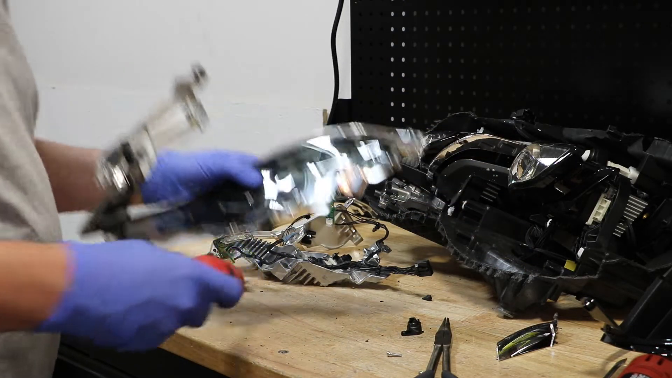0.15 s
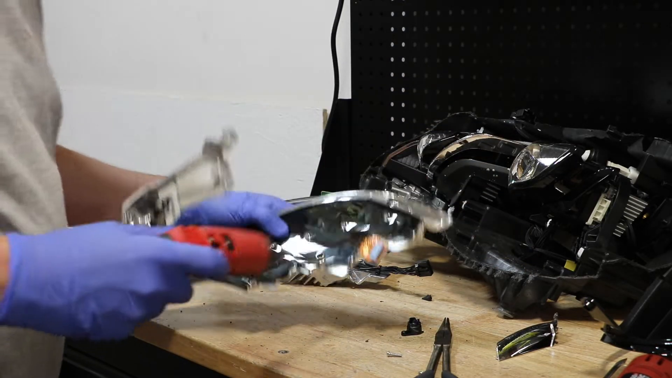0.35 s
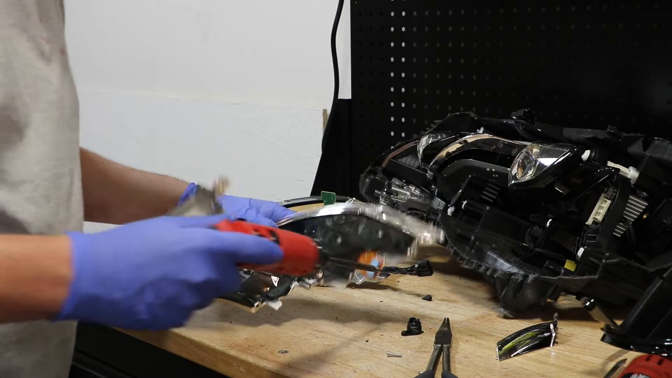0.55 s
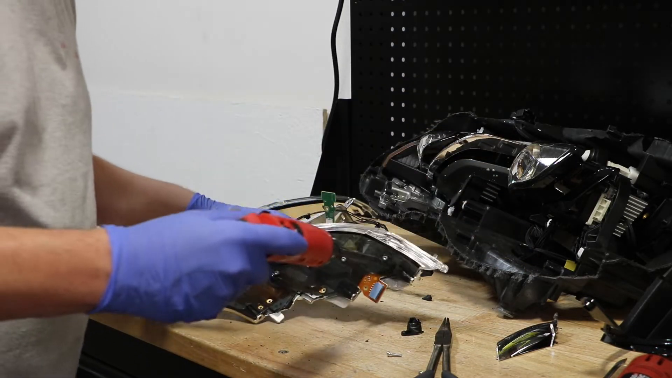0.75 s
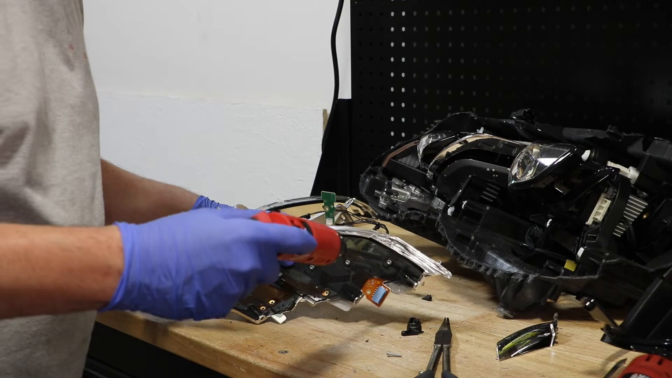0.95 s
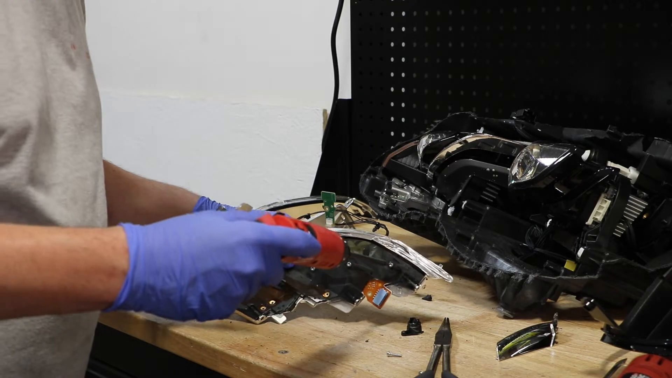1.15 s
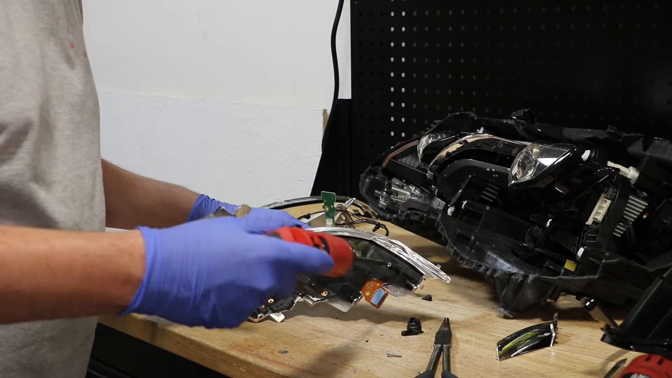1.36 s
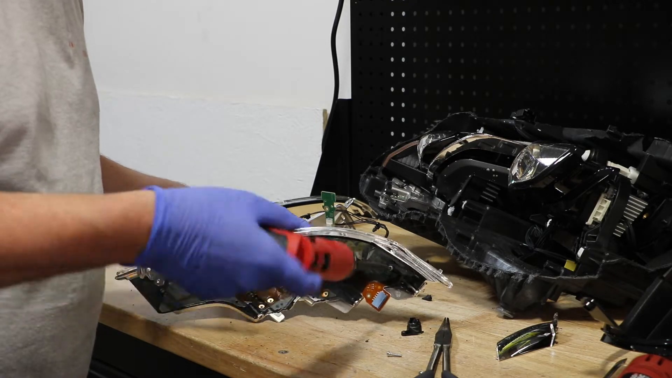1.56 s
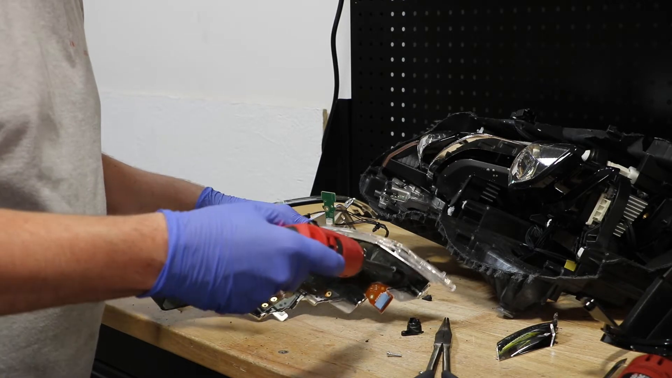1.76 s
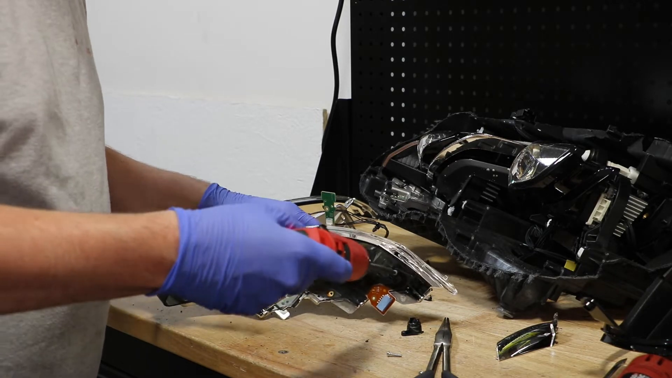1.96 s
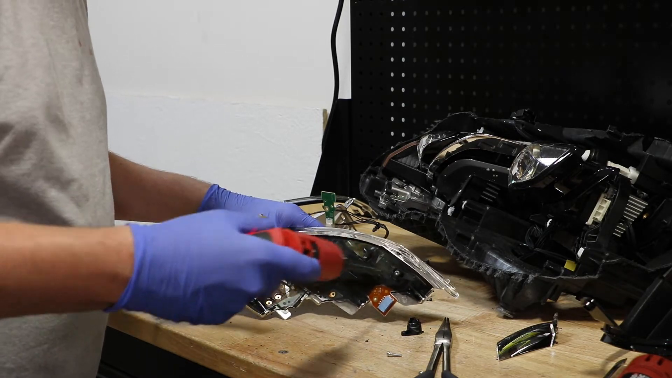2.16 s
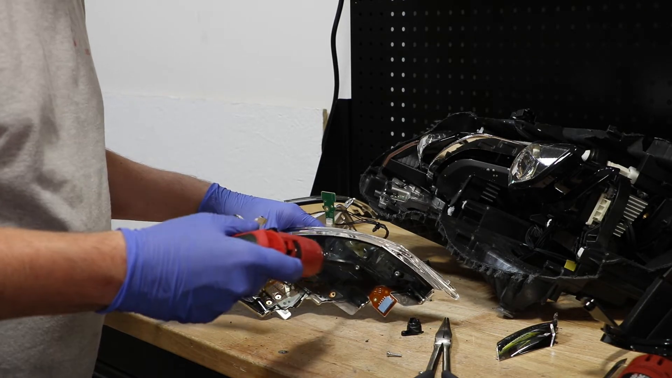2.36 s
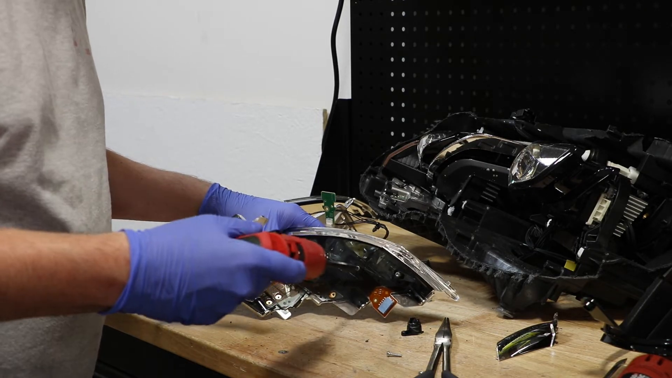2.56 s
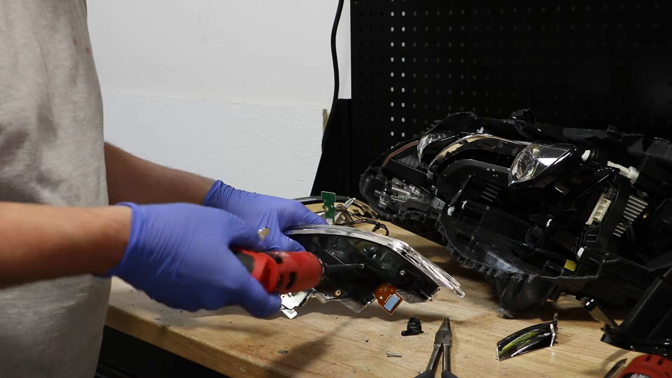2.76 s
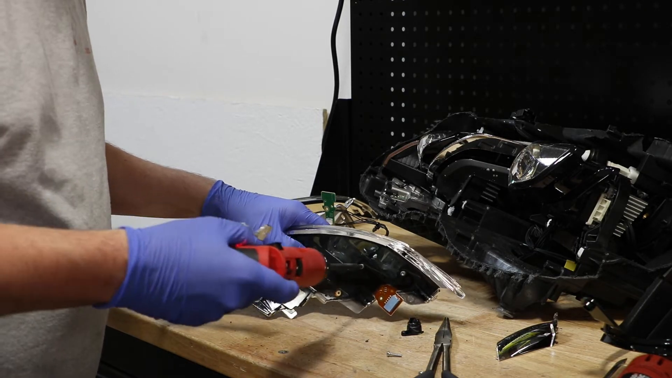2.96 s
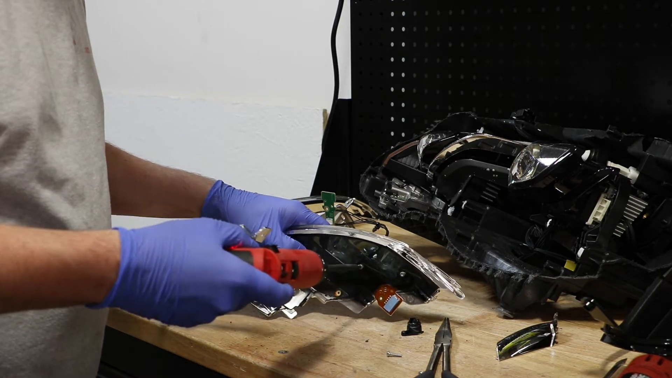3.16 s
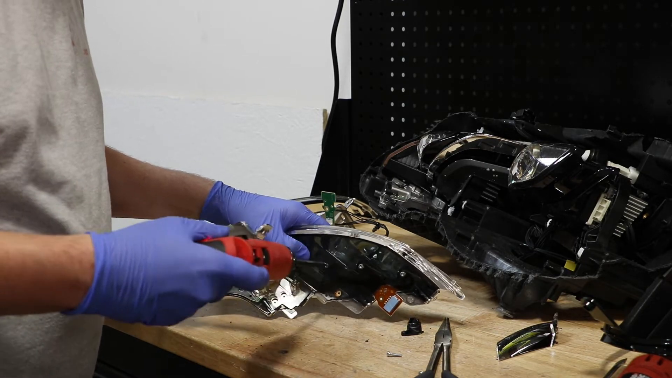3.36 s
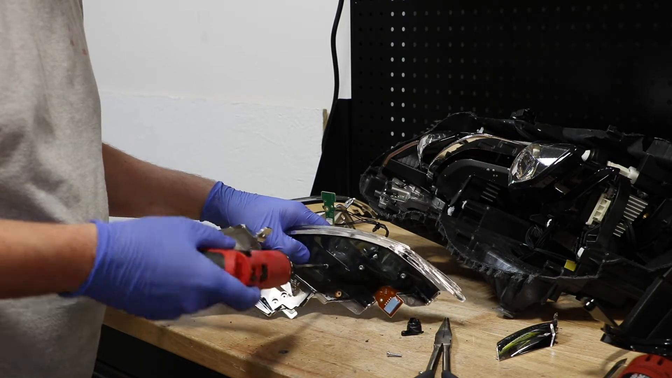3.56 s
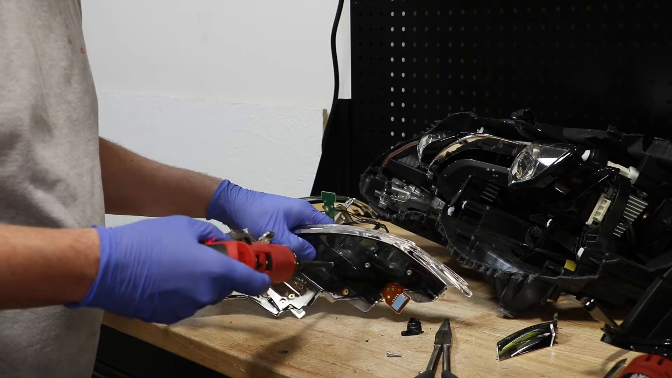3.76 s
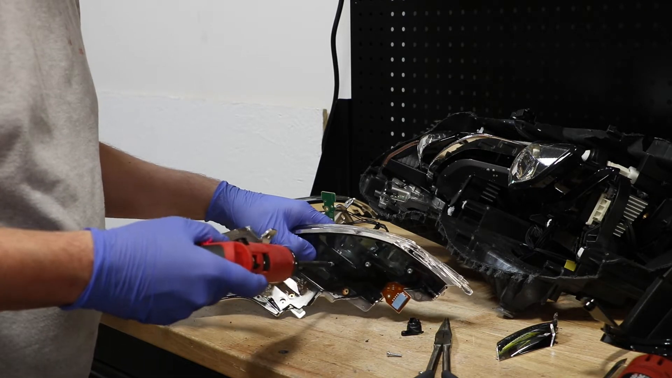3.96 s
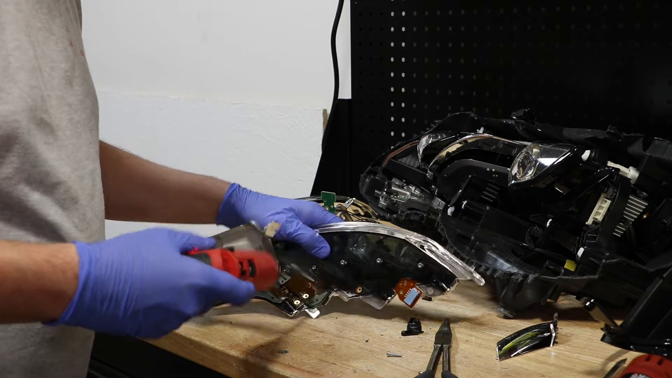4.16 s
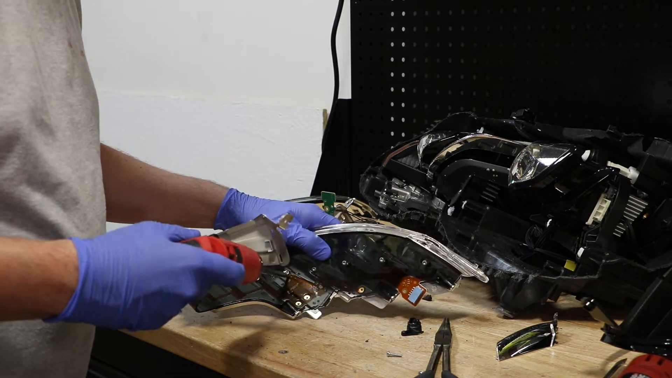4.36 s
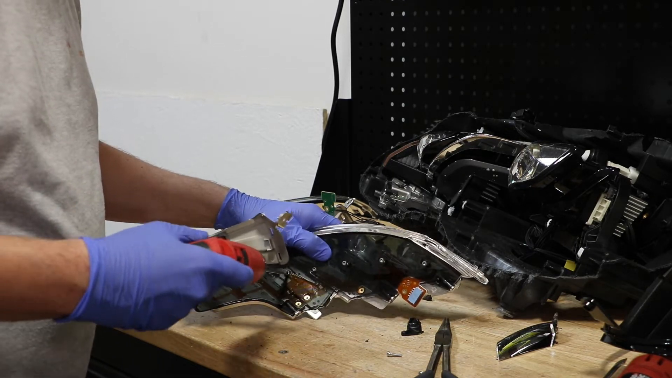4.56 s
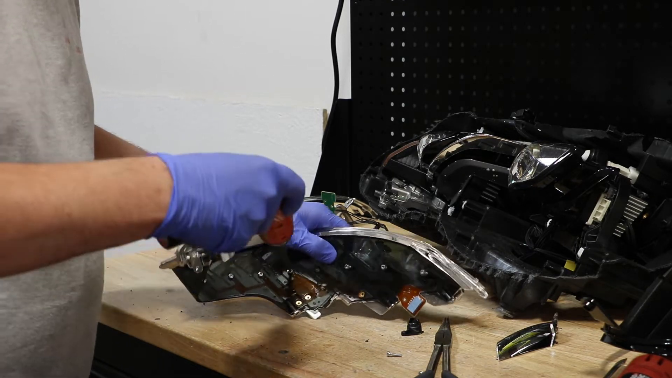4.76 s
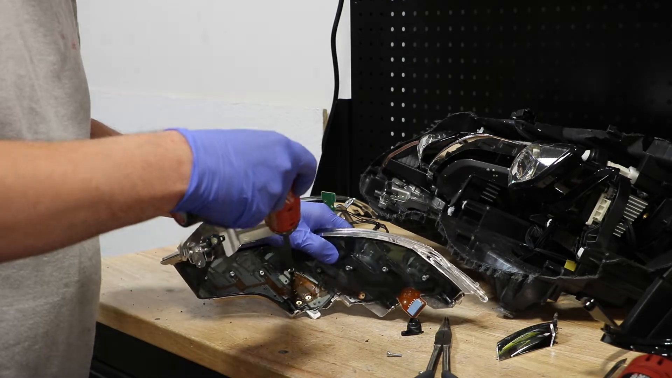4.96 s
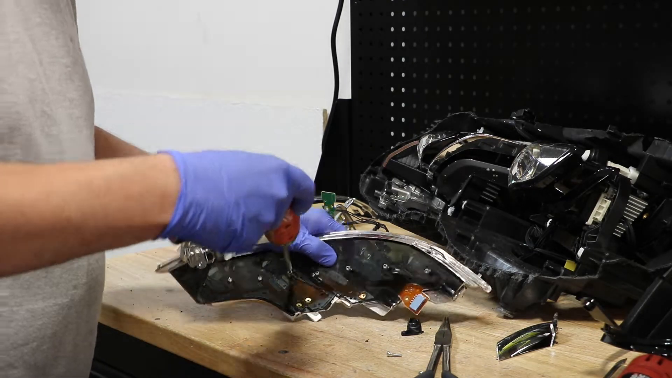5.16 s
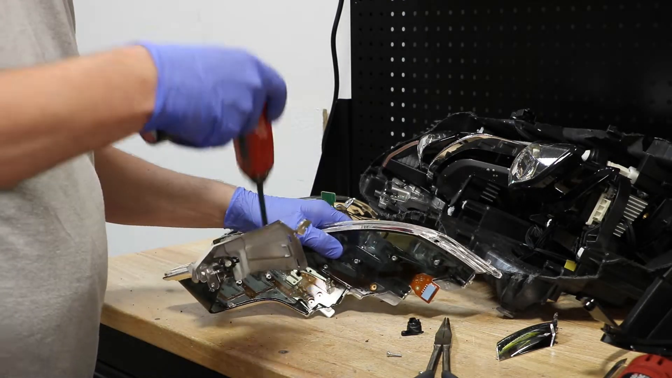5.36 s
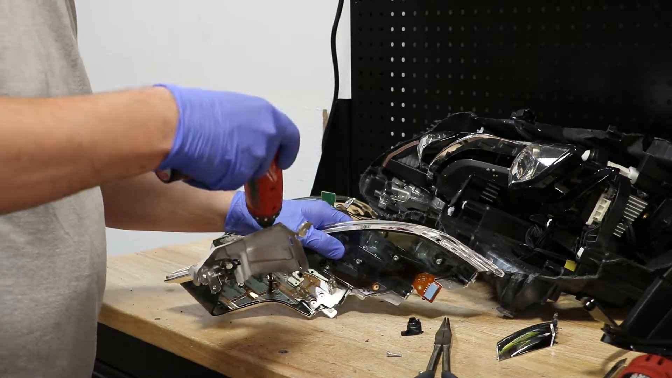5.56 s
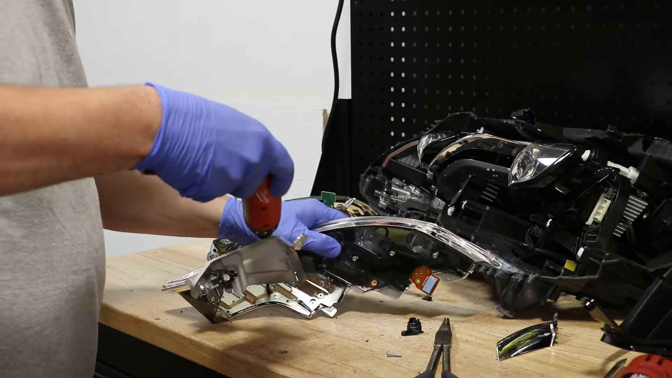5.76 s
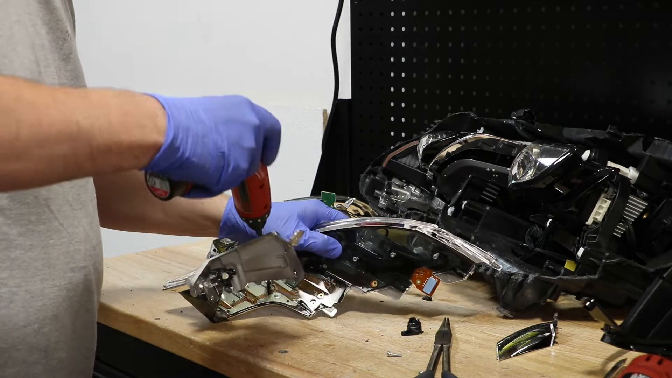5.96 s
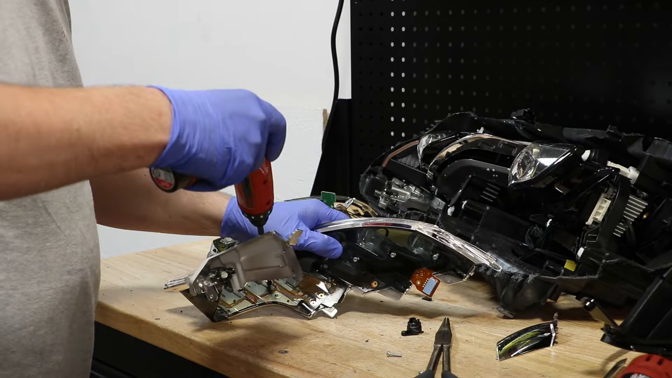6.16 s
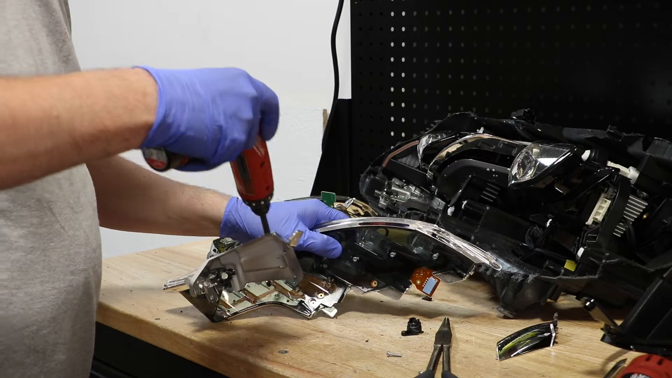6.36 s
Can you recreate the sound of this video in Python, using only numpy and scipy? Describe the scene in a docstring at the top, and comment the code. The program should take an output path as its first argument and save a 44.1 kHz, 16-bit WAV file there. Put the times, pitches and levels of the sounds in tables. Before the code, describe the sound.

Close-up bench work: a rigid plastic piece is set down with a clattering thud and a short slide. Then crisp ticks and slips of a metal bit lead into five short runs of a small cordless screwdriver, gritty gear whine climbing and dropping away. Later bursts add a rattling buzz from the plastic housing. A low room hum and a slight short reverberation lie behind it.

```python
"""A plastic part scrapes and knocks as it is set down on a wooden bench, in a faintly humming workshop.
Then a small cordless screwdriver backs screws out of it in five bursts; the bit ticks, slips and searches.
Knocks are gritty contacts ringing decaying modes; rubbing is patchy filtered noise. The motor is orders of
the shaft speed, gear noise, brush hiss and housing buzz. The microphone's limiter ducks after loud peaks."""
import sys
import numpy as np
from scipy import signal
from scipy.fft import rfft, irfft
from scipy.io import wavfile
from scipy.ndimage import uniform_filter1d, minimum_filter1d

SR = 44100
rng = np.random.default_rng(int(sys.argv[2]) if len(sys.argv) > 2 else 0)


def dump(signal):
    """Clip the signal to [-1, 1] and save it as 16-bit WAV at the path in sys.argv[1]."""
    limited = np.clip(np.atleast_2d(signal).T, -1, 1)
    pcm = np.round(limited * 32767).astype(np.int16)
    wavfile.write(sys.argv[1], SR, pcm)


N = 286650

# Workshop noise spectrum: (frequency [Hz], relative density [dB])
SHOP_SPECTRUM = [(120, -40.5), (200, 0), (454, -1.5), (506, -1), (609, -1), (663, -2), (888, -9.5),
                 (1100, -1), (1430, -34), (2420, -120)]
# Deep rumble spectrum: (frequency [Hz], relative density [dB])
RUMBLE_SPECTRUM = [(12, -36), (20, -2.5), (65, 6.5), (97, -6), (124, -6), (140, -18), (180, -43.5),
                   (310, -120)]
# Room over time: (time [s], noise level [dB], rumble level [dB])
ROOM_LEVELS = [(0.0, -39.5, -53), (0.12, -48, -62), (0.54, -66, -64), (0.74, -64, -70), (0.8, -48, -45.5),
               (1.0, -54, -62), (1.18, -65.5, -80), (1.9, -68, -81), (2.6, -66.5, -78), (3.1, -69, -86),
               (4.14, -60.5, -77), (5.27, -77, -80), (5.7, -53.5, -61), (6.1, -66.5, -76), (6.5, -65, -74)]
# Hum bands: (frequency [Hz], width [Hz], mean level [dB])
HUM_BANDS = [(119, 14, -72.5), (524, 3.8, -74.5), (631, 14, -69), (834, 17, -76.5)]
# Drone swells, added to its steady level: (time [s], level [dB])
DRONE_SWELLS = [(0.4, -68), (0.76, -67), (1.2, -69), (1.57, -65), (2.0, -55.5), (2.3, -64), (3.06, -70),
                (4.14, -73.5), (5.05, -60.5), (5.79, -64)]
DRONE_HZ, DRONE_DB, SWELL_S = 165.3, -71, .05

# Dull scrape spectrum: (frequency [Hz], relative density [dB])
SCRAPE_SPECTRUM = [(410, -41), (700, -33.5), (1220, -32), (1320, 0.5), (1440, 6.5), (2210, 9), (2620, -7),
                   (3000, -39), (3900, -60.5), (6600, -120)]
# Plastic creak spectrum: (frequency [Hz], relative density [dB])
CREAK_SPECTRUM = [(1470, -24.5), (2500, -5), (3450, 2.5), (3780, -4), (4130, -3.5), (4650, 0), (5650, -9),
                  (7500, -15.5), (8200, -26), (10700, -43), (18000, -120)]
# Thin fizz spectrum: (frequency [Hz], relative density [dB])
FIZZ_SPECTRUM = [(7000, -20.5), (8300, -3.5), (11500, -7), (12500, -12.5), (15900, -14)]
# Part lowered, set down and slid: (time [s], scrape [dB], creak [dB], fizz [dB])
HANDLING = [(0.0, -41, -54.5, -55.5), (0.172, -52, -51, -73), (0.368, -47, -59, -72),
            (0.478, -46, -57.5, -55), (0.56, -52, -76, -77), (0.645, -50.5, -92, -80),
            (0.665, -40, -81, -86), (0.777, -55, -83, -71), (0.857, -27, -40, -86), (0.939, -37, -46, -86),
            (1.011, -39.5, -63, -89.5), (1.16, -61, -50, -80)]
# Bit seeks the next screw, pressing harder:
# (start [s], end [s], scrape [dB], first creak [dB], last creak [dB])
SEARCHES = [(1.15, 1.664, -57, -52, -50), (2.244, 2.84, -64, -86, -37.5), (3.4, 3.645, -65, -64, -41),
            (4.25, 4.762, -62, -49, -45), (5.507, 6.003, -61.5, -63, -49)]
# Hands just holding on: (scrape [dB], creak [dB], fizz [dB])
RESTING_DB = (-73.5, -72.5, -91)
# Rubbing shaken loose, re the smoothed click envelope: (scrape [dB], creak [dB], fizz [dB])
SHAKEN_DB = (-33.5, -35, -45)
SHAKEN_T60_S = 0.24
FIZZ_RE_CREAK_DB, UNSTEADY_DB = -24, 1.5  # while searching; wander of the hand
# Squeak bands: (frequency [Hz], width [Hz], level before fading [dB])
SQUEAK_BANDS = [(706, 126, -45.5), (2670, 240, -47), (3450, 250, -55)]
SQUEAK_START_S, SQUEAK_END_S = 5.515, 5.58

# Part meets bench: (time [s], peak before a 1 dB lift [dB], treble tilt [dB], contact t60 [s])
THUDS = [(0.388, -31, 6.5, 0.078), (0.653, -21.5, -29.5, 0.1), (0.766, -33, -0.5, 0.089),
         (0.79, -4.5, 1, 0.055), (0.803, -3, -31.5, 0.018), (0.872, -10, -2.5, 0.02),
         (0.878, -12, -30.5, 0.048), (0.893, -9.5, -39, 0.064), (0.937, -9, -22, 0.093)]
# Bench modes, detuned and varied per knock: (frequency [Hz], level [dB], t60 before cap [s])
BENCH_MODES = [(677, -64.5, 0.013), (1150, -25.5, 0.075), (1226, 10, 0.052), (1382, 4, 0.15),
               (1675, 5, 0.09), (1970, 6, 0.0099), (1970, -6, 0.0083), (2550, 0.5, 0.017),
               (3870, -31.5, 0.022)]
# Housing modes, detuned and varied per knock: (frequency [Hz], level [dB], t60 before cap [s])
HOUSING_MODES = [(1237, -6, 0.025), (1448, 0.5, 0.0095), (2025, 0, 0.0058), (2790, -15, 0.014),
                 (3032, -10, 0.017), (3683, -0.5, 0.0068), (4310, -7.5, 0.048), (4925, -12.5, 0.023),
                 (5314, -3, 0.01), (5950, -9, 0.047), (6560, -0.5, 0.0053), (7300, -6.5, 0.0067),
                 (8226, -5, 0.0073), (9830, -18, 0.011), (12720, -3, 0.0025), (13060, -26, 0.014),
                 (14300, 1, 0.021)]
# Sharp clicks of the bit: (time [s], peak [dB], favoured ring [Hz], low tilt [dB], top tilt [dB],
# contact t60 [s])
TICKS = [(1.181, -11, 2820, -14.5, -28, 0.013), (1.2503, -17, 2690, -3.5, -36, 0.029),
         (1.2633, -17, 5400, -26, -6, 0.0066), (1.3244, -18.5, 6200, -14, -7, 0.0095),
         (1.3595, -18.5, 2690, -9, -31, 0.016), (1.3791, -17, 6660, -2, -24, 0.041),
         (1.5216, -2, 5900, -3.5, -11, 0.027), (1.5481, -3, 6500, -36, -7, 0.0027),
         (1.5917, -2.5, 4040, -9.5, -14, .008), (1.6345, -7, 2720, -23, -2, .003),
         (1.6612, -8.5, 2180, -50, -9, 0.29), (1.7659, 4, 5700, -31, -8.5, 0.02),
         (1.8064, -1, 4630, -14.5, -3, 0.011), (1.8702, -3.5, 3450, -12, -13, 0.035),
         (1.8746, -2, 6100, -22, 0, 0.02), (2.0087, -3, 5460, -20, -9, 0.018),
         (2.0424, 10.5, 6000, -38, -11, 0.0038), (2.076, -0.5, 5330, -20, -2, 0.021),
         (2.297, -14, 4720, -22, -26, 0.024), (2.3288, -11.5, 6340, -52, -10, 0.024),
         (2.3563, -17, 6000, -44, -29, 0.013), (2.4002, -18, 4310, -22, -16, 0.012),
         (2.4255, -8, 4200, -15, -22, 0.033), (2.475, -16.5, 4270, -10, -55, 0.025),
         (2.5604, -20.5, 4290, -7, -27, 0.012), (2.619, 0, 4630, -14.5, -13, 0.013),
         (2.739, 4, 6100, -2.5, -11, 0.014), (2.8025, -7, 6430, -33, 6.5, 0.0078),
         (2.9417, -2.5, 3680, -10, -9, 0.01), (3.1546, 0.5, 3700, -21.5, -12, 0.0062),
         (3.1878, 12, 3640, -42, -9.5, 0.0024), (3.2175, -1.5, 3680, -26, -10, 0.0096),
         (3.481, -7.5, 3700, -24, -21, 0.0085), (3.5094, -15, 3570, -16, -38, 0.0062),
         (3.5585, -0.5, 3450, -15.5, -12, .021), (3.5628, 1, 3320, -6, -5, 0.0024),
         (3.6466, -3, 2550, -26.5, -15, 0.057), (3.935, -0.5, 4630, -12, -24, 0.01),
         (3.9715, -5, 4270, -9, -18, 0.013), (4.005, -20, 4270, -1, -18, .012),
         (4.219, -13.5, 5200, -27, -13, 0.0094), (4.2981, -2.5, 4900, -8.5, -6, 0.013),
         (4.3224, -3.5, 3600, -11, -2.5, .048), (4.5157, -2.5, 3700, -11, -32, 0.0081),
         (4.5434, -6, 2100, -17, -14.5, 0.033), (4.6091, -2, 3800, -14.5, -21, 0.0092),
         (4.6419, 1.5, 3720, -9, -14.5, 0.0039), (4.7081, -7, 5340, -46, -5.5, 0.0083),
         (4.7367, -16, 3660, -38, 1, 0.018), (4.7807, -0.5, 3670, -9.5, -22, .012),
         (4.8049, -0.5, 3680, -2.5, -10, 0.0076), (4.8245, -2.5, 3700, -28, -9, .008),
         (4.848, -0.5, 3660, -15, -8.5, 0.019), (4.883, 2.5, 4040, -26, -8.5, 0.0093),
         (5.1142, -5.5, 4280, -17.5, -2, 0.024), (5.6003, -8.5, 3040, -15, -54.5, 0.0089),
         (5.6602, 0.5, 3030, -29, -9, 0.0067), (5.6633, -6, 3060, -12, -4, 0.0026),
         (5.7235, -7, 5700, -7, 7, 0.042), (5.8637, -12, 3700, -27, -22, 0.025),
         (5.8673, 14, 3700, -2, -9.5, 0.0075), (5.9022, 5, 3060, -17, -20, .005),
         (5.9656, -10, 5060, -40, -2, 0.0086), (5.9885, -6, 5230, -58, -10, 0.34),
         (6.2849, -8, 6400, -17, -18, 0.008)]
# Bit skids before it catches: (time [s], peak [dB], favoured ring [Hz], low tilt [dB], top tilt [dB],
# contact t60 [s])
SLIPS = [(1.2363, -17.5, 1680, -6, -25, 0.032), (1.3371, -21.5, 3160, -15, -27, 0.028),
         (1.4563, 3, 7260, -11, -13, 0.0066), (1.493, -20, 5700, -8, 1, 0.024),
         (1.5574, -16, 6400, -32, -9, 0.012), (2.5707, -10, 6600, -14, -6, 0.0065),
         (2.7933, -15, 3660, -38, -7, .038), (2.9385, -1, 3700, -11.5, -2, 0.019),
         (2.9973, -1.5, 2130, -12.5, -4.5, 0.039), (3.0241, 0.5, 4500, -9.5, -6.5, 0.0058),
         (3.046, -3, 4260, -13, -10, 0.02), (3.133, -10.5, 2500, -20, -20, 0.015),
         (3.6217, -8.5, 3360, -27, 2, 0.0049), (4.046, -6, 4500, -23, -3.5, 0.012),
         (4.1154, -2.5, 4100, -11, -0.5, 0.012), (4.5806, 0, 3750, -12, -9, 0.0073),
         (4.6678, -15, 3660, -34, -8, 0.054), (4.765, -2.5, 4430, -49, -5, 0.069),
         (5.207, -4.5, 4900, -27, -2.5, 0.053), (5.2469, -26, 4390, -29, -10, 0.077),
         (6.4307, -9, 5000, -28, -31, 0.17)]
# Faint touches of the searching bit: (time [s], peak [dB], favoured ring [Hz])
TOUCHES = [(1.4044, -33, 3170), (1.444, -32, 5000), (2.5184, -28, 4330), (2.5824, -25, 4350),
           (2.677, -23, 5500), (2.7192, -21, 5380), (3.531, -26, 2140), (4.2358, -30, 3060),
           (4.3863, -25, 3350), (4.412, -26.5, 2690), (4.426, -27.5, 2690), (4.4637, -23, 3080),
           (5.626, -29, 4530)]
TOUCH_LOW_DB, TOUCH_TOP_DB, TOUCH_T60_S = -16.5, -32, 0.013
TICK_RISE_S, SLIP_RISE_S, TOUCH_RISE_S = 0.00047, 0.0036, .0012  # per 11 dB of swell
LEAD_S = .02  # room for the swell before a peak
HOUSING_CAP_S, BENCH_CAP_S = .022, .046  # longest mode t60; the gripping hand damps the housing

# Driven shaft speed, one curve a burst: (time [s], speed [turns/s])
SPEEDS = [
    [(1.655, 82), (1.72, 124), (1.835, 136.5), (1.87, 144), (1.965, 172), (2.0, 177.5), (2.097, 183.5)],
    [(2.822, 81), (2.87, 129), (2.93, 157), (3.03, 169.5), (3.1, 174.5), (3.217, 181.5)],
    [(3.642, 87), (3.71, 133), (3.755, 146), (3.9, 176), (3.96, 182.5), (4.027, 184)],
    [(4.755, 87), (4.828, 113), (4.9, 130), (5.0, 150), (5.1, 161.5), (5.19, 176)],
    [(5.985, 63), (6.05, 133), (6.085, 146.5), (6.12, 155.5), (6.25, 179), (6.358, 186.5)],
]
# Load, one curve a burst, before low-speed fading: (time [s], gear noise [dB], brush hiss [dB])
LOADS = [
    [(1.655, -20.5, -33), (1.717, -19.5, -33), (1.797, -23.5, -34), (1.975, -24, -37),
     (2.097, -27.5, -38.5)],
    [(2.822, -16.5, -29), (2.914, -21, -30), (2.968, -27, -33), (3.074, -26.5, -34), (3.217, -27.5, -38)],
    [(3.642, -21, -30), (3.702, -20, -31), (3.792, -18, -30.5), (3.872, -24.5, -33.5), (4.027, -22.5, -34)],
    [(4.755, -17.5, -39), (4.833, -53.5, -32), (4.941, -22, -29), (4.989, -20.5, -29.5), (5.19, -32, -39.5)],
    [(5.985, -20.5, -24), (6.045, -22, -34), (6.105, -17, -33), (6.183, -22.5, -34), (6.358, -25, -33.5)],
]
# Whine and wobble, one row a burst; 3 dB is added to both whines: (driven whine re gear noise [dB],
# coasting whine re gear noise [dB], whine lift near 1 kHz [dB], shaft wobble in the buzz [0-1])
WHINES = [(-14.5, -10, 0, .4), (-16, -10, 0, .4), (-19, -12, 0, .4), (-21, -15, 0, .7), (-14, -7, 6, .3)]
# Loosened screw shakes the housing, one row a burst: (time [s], buzz before low-speed fading [dB])
LOOSENED = [(1.85, -73), (2.95, -63), (3.93, -47.5), (4.75, -35), (6.22, -43.5)]
# Five commutator bars: (multiple of shaft speed, relative level [dB])
BAR_ORDERS = [(5, 0), (10, -15), (15, 0), (20, -3), (25, -8), (30, -5), (40, -7), (45, 1), (75, -5)]
# Gear teeth under load: (multiple of shaft speed, relative level [dB])
MESH_ORDERS = [(6.75, -13), (13.5, -10), (27, 0), (33.75, 0), (37.5, 2), (40.5, -2)]
# Radiation of the small case, weak in the bass: (frequency [Hz], gain [dB])
RADIATED = [(400, -45), (900, -22), (1150, -9), (1600, -2), (2000, 0), (7000, 0), (8000, -8), (11000, -22),
            (13800, -8)]
# Gear noise spectrum: (frequency [Hz], relative density [dB])
GEAR_SPECTRUM = [(410, -66), (700, -38.5), (923, -61), (1060, -56), (1300, -75), (1480, -9), (2090, 5.5),
                 (2550, 0), (3030, 2.5), (3400, -1), (4910, -4), (7100, 6), (11000, -7.5), (14300, -58),
                 (22000, -120)]
# Tool case resonances, before a factor 1.1: (frequency [Hz], width [Hz], gain [dB])
CASE_RESONANCES = [(3280, 45, -8), (3920, 22, -19), (4270, 680, 3), (4640, 900, 19.5), (6760, 380, -21)]
# Brush hiss spectrum: (frequency [Hz], relative density [dB])
BRUSH_SPECTRUM = [(5290, -21), (9000, 11), (9810, 5.5), (15100, 12.5), (15900, -22.5)]
# Housing driven by the shaft: (frequency [Hz], relative density [dB])
BUZZ_SPECTRUM = [(300, -55), (450, -22), (600, -5), (1000, -1), (1500, 0), (2200, -5), (2900, -28),
                 (4800, -90)]
SHELL_HZ, SHELL_WIDTH_HZ, SHELL_RE_BUZZ_DB = 3660, 830, 12.2  # housing ring that the buzz excites
GEAR_KNEE, HISS_KNEE, BUZZ_KNEE = 38.2, 52, 87  # turns/s at which each gain is halved
BUZZ_IDLE_DB, BUZZ_RISE_S = -80, .04  # before the screw is loose
FRICTION, DRAG_PER_S = 750, 3.1  # coasting loss [turns/s per s]; share of speed lost [1/s]
CREEP, CREEP_S = 30, .05  # soft stop: creeping speed [turns/s]; time added for it

BAND_LIMIT_HZ = 15900


def gain_of(db):
    """Decibels to gain."""
    return 10 ** (np.asarray(db) / 20)


def evened(x):
    """Scaled to rms 1."""
    return x / np.sqrt(np.mean(x ** 2) + 1e-20)


def read(points, hz):
    """Spectrum table read on a log frequency axis."""
    f, value = np.transpose(points)
    return np.interp(np.log(hz + 1), np.log(f + 1), value)


def add(mix, s, sound):
    """Mixes a sound in at time s."""
    part = mix[round(s * SR):][:len(sound)]
    part += sound[:len(part)]


def colour(x, points):
    """Filters by a spectrum table."""
    hz = np.fft.rfftfreq(len(x), 1 / SR)
    return irfft(rfft(x) * gain_of(read(points, hz)), len(x))


def resonate(x, hz, width_hz):
    """Fixed resonance of gain 1."""
    return signal.lfilter(*signal.iirpeak(hz, hz / width_hz, SR), x)


def drift(size, span_s):
    """Slow random curve of rms 1: noise averaged twice over span_s."""
    smooth = max(round(span_s * SR), 1)
    return evened(uniform_filter1d(uniform_filter1d(rng.standard_normal(size), smooth), smooth))


def unroll(rows, t=None):
    """Sample times and interpolated columns of a curve."""
    s, *columns = np.transpose(rows)
    if t is None:
        t = np.arange(s[0], s[-1], 1 / SR)
    return t, [np.interp(t, s, c) for c in columns]


def shop():
    """Filtered room noise and rumble, a narrow-band drone that swells and a wavering hum."""
    t, (noise_db, rumble_db) = unroll(ROOM_LEVELS, np.arange(N) / SR)
    noise = gain_of(noise_db) * evened(colour(rng.standard_normal(N), SHOP_SPECTRUM))
    rumble = gain_of(rumble_db) * evened(colour(rng.standard_normal(N), RUMBLE_SPECTRUM))
    swells = sum(gain_of(db) * np.exp(-((t - s) / SWELL_S) ** 2) for s, db in DRONE_SWELLS)
    band = resonate(resonate(rng.standard_normal(N), DRONE_HZ, 25), DRONE_HZ, 25)
    drone = (gain_of(DRONE_DB) + swells) * evened(band)
    hum = np.zeros(N)
    for hz, width_hz, db in HUM_BANDS:
        waver = gain_of(db + 2.0 * drift(N, 0.21))
        hum += waver * evened(resonate(rng.standard_normal(N), hz, width_hz))
    return noise + rumble + drone + hum


def room(x):
    """Short noise tail, delayed 150 samples; bass lasts longest, 2 kHz dies first."""
    hz, t, z = signal.stft(rng.standard_normal(SR // 2), SR, nperseg=256)
    t60_s = read([(500, 0.47), (2000, 0.1), (8000, 0.23)], hz)[:, None]
    tail = signal.istft(z * gain_of(-60 * t / t60_s), SR, nperseg=256)[1]
    response = np.append(np.zeros(150), tail / np.linalg.norm(tail))
    return signal.fftconvolve(x, response)[:N]


def rubbing(levels):
    """Grainy, patchy noise: a dull scrape, a plastic creak and a thin fizz at the given gains."""
    noise = rng.standard_normal((3, N)) * gain_of(1.56 * drift(N, 0.019))
    z = signal.stft(noise, nperseg=256)[2]
    patches = uniform_filter1d(rng.standard_normal(z.shape), size=4, axis=1)  # over frequency
    patches = uniform_filter1d(patches, size=14, axis=2)  # over time
    grain = signal.istft(z * gain_of(2.8 * evened(patches)), nperseg=256)[1][:, :N]
    spectra = SCRAPE_SPECTRUM, CREAK_SPECTRUM, FIZZ_SPECTRUM
    return sum(level * evened(colour(g, shape)) for level, g, shape in zip(levels, grain, spectra))


def squeak():
    """One faint squeak: noise through doubled resonances, faded in and out."""
    slip = rng.standard_normal(round((SQUEAK_END_S - SQUEAK_START_S) * SR))
    bands = 0
    for hz, width_hz, db in SQUEAK_BANDS:
        bands = bands + gain_of(db) * evened(resonate(resonate(slip, hz, width_hz), hz, width_hz))
    return bands * np.hanning(len(slip))


def handling(clicks):
    """Rubbing as hands move the part, the bit searches and clicks shake it; one squeak."""
    levels = gain_of(RESTING_DB)[:, None] * np.ones(N)
    t, moved_db = unroll(HANDLING)
    add(levels.T, t[0], gain_of(moved_db).T)
    for start, end, scrape_db, first_db, last_db in SEARCHES:
        t, (creak_db,) = unroll([(start, first_db), (end, last_db)])
        hand = gain_of(UNSTEADY_DB * drift(len(t), 0.09)) * signal.windows.tukey(len(t), .1)
        pressed_db = [scrape_db + 0 * t, creak_db, creak_db + FIZZ_RE_CREAK_DB]
        add(levels.T, start, (hand * gain_of(pressed_db)).T)
    keep = 1e-6 ** (1 / (SHAKEN_T60_S * SR))  # power kept per sample
    shaken = np.sqrt(signal.lfilter([.01], [1, -keep], clicks ** 2))
    out = rubbing(levels + gain_of(SHAKEN_DB)[:, None] * shaken)
    add(out, SQUEAK_START_S, squeak())
    return out


def knock(modes, tilt, main_hz, rise_s, t60_s, crack, after, cap_s):
    """A gritty contact swells, peaks and dies; heard directly and ringing modes, favoured near main_hz."""
    t = np.arange(6000) / SR - LEAD_S
    hz, db, ring_s = np.transpose(modes)[:, :, None]
    luck, detune = rng.standard_normal((2,) + hz.shape)
    db = db + 2.5 * luck + 9 * np.exp(-(np.log(hz / main_hz) / .1) ** 2)
    since = t[:3000] + LEAD_S
    decay = gain_of(db - 60 * since / np.minimum(ring_s, cap_s))
    body = (decay * np.sin(2 * np.pi * hz * (1 + .012 * detune) * since)).sum(0)
    grit = rng.standard_normal(len(t))
    swell = gain_of(11 * np.minimum(t, 0) / max(rise_s, 1e-4))
    contact = grit * swell * gain_of(-60 * np.maximum(t, 0) / max(t60_s, .002))
    contact[round(LEAD_S * SR)] += 4.0  # moment of impact
    rung = evened(signal.fftconvolve(contact, body)[:len(t)])
    # loose bits rattle on
    loose = after * grit[::-1] * (t > 0) * gain_of(-60 * t / 0.19) / np.std(contact)
    sound = colour(crack * evened(contact) + rung + loose, tilt)
    return sound / abs(sound).max()


def thuds():
    """Hollow part knocks on wood, ringing the bench modes."""
    out = np.zeros(N)
    for s, db, treble_db, t60_s in THUDS:
        tilt = [(150, -51.5), (600, -15), (2400, -1.5), (3200, treble_db), (6000, treble_db - 19.0),
                (11000, treble_db - 23.5), (13000, treble_db - 67)]
        sound = knock(BENCH_MODES, tilt, 1876, 0.00016, t60_s, crack=1.0, after=0.19, cap_s=BENCH_CAP_S)
        add(out, s - LEAD_S, gain_of(db + 1.0) * sound)
    return out


def ticks():
    """Bit clicks, slips and touches, ringing the housing modes."""
    touches = [row + (TOUCH_LOW_DB, TOUCH_TOP_DB, TOUCH_T60_S) for row in TOUCHES]
    out = np.zeros(N)
    for rows, rise_s in (TICKS, TICK_RISE_S), (SLIPS, SLIP_RISE_S), (touches, TOUCH_RISE_S):
        for s, db, hz, low_db, top_db, t60_s in rows:
            tilt = [(350, low_db - 23.0), (900, low_db - 10.5), (1500, low_db + 3.0), (2200, 0),
                    (7500, 0.294), (9500, top_db + 4), (16000, top_db - 2.5)]
            sound = knock(HOUSING_MODES, tilt, hz, rise_s, t60_s, crack=0.66, after=0.072,
                          cap_s=HOUSING_CAP_S)
            add(out, s - LEAD_S - .0005, gain_of(db) * sound)
    return out


def coasted(speed):
    """Times and shaft speed: driven along the table, then slowed by friction and drag until it stops."""
    (start, _), (release, top) = speed[0], speed[-1]
    rest = FRICTION / DRAG_PER_S
    stop = release + np.log(1 + top / rest) / DRAG_PER_S
    t = np.arange(start, stop + CREEP_S, 1 / SR)
    coast = (top + rest) * np.exp(-DRAG_PER_S * (t - release)) - rest
    soft = (coast + np.hypot(coast, CREEP)) / 2
    return t, np.where(t < release, unroll(speed, t)[1][0], soft)


def motor_whine(turns, driven, driven_db, coasting_db, low_db):
    """Commutator orders, plus gear-tooth orders under load, radiated by the small case."""
    def tone(order, db):
        flutter_db = (2 + 2.5 * driven) * drift(len(turns), .015)
        return gain_of(db + flutter_db) * np.sin(2 * np.pi * (order * turns + rng.random()))

    orders = sum(tone(*row) for row in BAR_ORDERS) + driven * sum(tone(*row) for row in MESH_ORDERS)
    lift = [(750, 0), (1000, low_db), (1150, low_db), (1350, 0)]
    level_db = 3 + np.interp(driven, (0, 1), (coasting_db, driven_db))
    return gain_of(level_db) * colour(colour(orders, RADIATED), lift)


def shaft_comb(turns):
    """An uneven shaft repeats nearly the same rattle every turn: orders 2-69, some standing out."""
    orders = np.arange(2, 70)[:, None]
    uneven = gain_of(3 * rng.standard_normal(orders.shape))
    phase = orders * turns + rng.random(orders.shape)
    comb = (uneven * np.sin(2 * np.pi * phase)).sum(0)
    return evened(comb * gain_of(1.43 * drift(len(turns), 0.009)))


def gear_rattle(comb, grit, driven):
    """Shaft comb and grit through the gear spectrum and case resonances."""
    rattle = colour(.6 * driven * comb + grit, GEAR_SPECTRUM)
    ring = sum(gain_of(db) * resonate(rattle, hz, width_hz) for hz, width_hz, db in CASE_RESONANCES)
    return evened(rattle + 1.1 * ring)


def housing_buzz(comb, grit, driven, wobble):
    """Held housing shaken by shaft comb and grit, with one shell ring."""
    shake = wobble * driven * comb + .55 * grit
    shell = evened(resonate(shake, SHELL_HZ, SHELL_WIDTH_HZ))
    return evened(colour(shake, BUZZ_SPECTRUM)) + gain_of(SHELL_RE_BUZZ_DB) * shell


def burst(load, speed, driven_db, coasting_db, low_db, wobble, loose_s, loose_db):
    """Motor and gearbox: whine and rattle, brush hiss and housing buzz, each dying with shaft speed."""
    t, rate = coasted(speed)
    n = len(t)
    noise_db, hiss_db = unroll(load, t)[1]
    buzz_db = np.interp(t, (loose_s - BUZZ_RISE_S, loose_s), (BUZZ_IDLE_DB, loose_db))

    def alive(knee):
        return rate ** 2 / (rate ** 2 + knee ** 2)

    turns = np.cumsum(rate * (1 + 0.00465 * drift(n, 0.0083))) / SR
    driven = uniform_filter1d(1. * (np.arange(n) < rate.argmax()), 600)  # trigger let go at top speed
    whine = motor_whine(turns, driven, driven_db, coasting_db, low_db)
    comb = shaft_comb(turns)
    grit = evened(rng.standard_normal(n) * gain_of(1.6 * drift(n, 0.0018)))
    rattle = gear_rattle(comb, grit, driven)
    hiss = evened(colour(rng.standard_normal(n) * gain_of(4.0 * drift(n, 0.0036)), BRUSH_SPECTRUM))
    buzz = housing_buzz(comb, grit, driven, wobble)
    body = gain_of(noise_db) * alive(GEAR_KNEE) * (rattle + whine)
    body += gain_of(hiss_db) * alive(HISS_KNEE) * hiss
    body += gain_of(buzz_db) * alive(BUZZ_KNEE) * buzz
    return body * signal.windows.tukey(n, .015)


def scene():
    """Workshop, handling and tool, with a room tail on knocks and motor."""
    clicks = ticks()
    near = clicks + thuds()
    for load, speed, whine, loose in zip(LOADS, SPEEDS, WHINES, LOOSENED):
        add(near, speed[0][0], burst(load, speed, *whine, *loose))
    return (near + gain_of(-11.0) * room(near) + handling(clicks) + shop())[None]


def record(dry):
    """Gain control ducks after loud peaks, a fast limiter holds full scale, then the band limit."""
    power_db = 10 * np.log10(abs(uniform_filter1d(dry[0] ** 2, 90)) + 1e-12)
    fall_db = np.arange(N) * 80.0 / SR  # recovery of 80 dB/s
    held_db = np.maximum.accumulate(power_db + fall_db) - fall_db
    over_db = np.maximum(held_db + 7.5, 0)
    ducked = dry / gain_of(.45 * uniform_filter1d(over_db, 121, origin=60))  # gain lags the peak
    room_left = minimum_filter1d(1 / np.maximum(abs(ducked), 1), 61)
    limited = ducked * uniform_filter1d(room_left, 31)
    low_pass = signal.firwin(511, BAND_LIMIT_HZ, window=("kaiser", 9), fs=SR)
    return signal.oaconvolve(limited, low_pass[None], "same")


dry = scene()
out = record(dry)
dump(out)
```